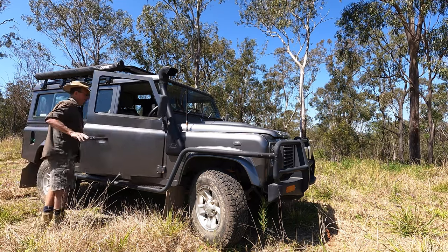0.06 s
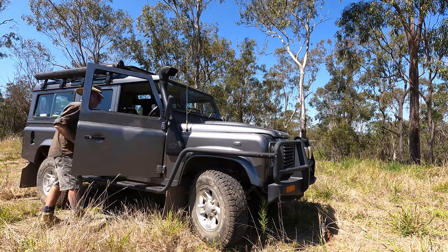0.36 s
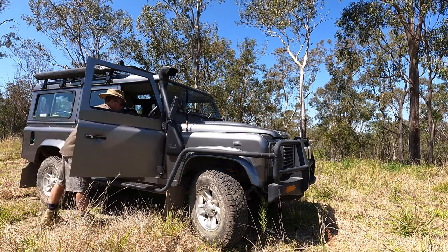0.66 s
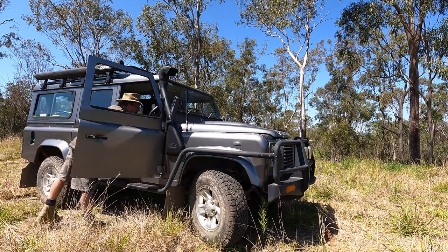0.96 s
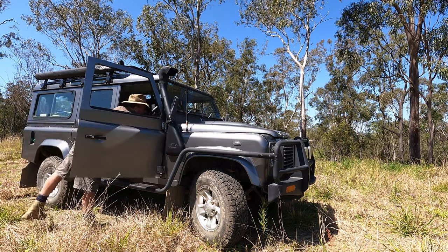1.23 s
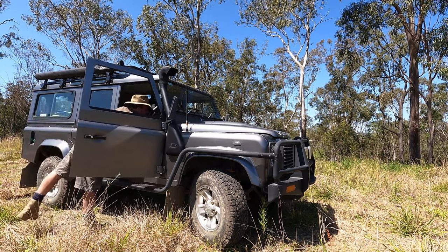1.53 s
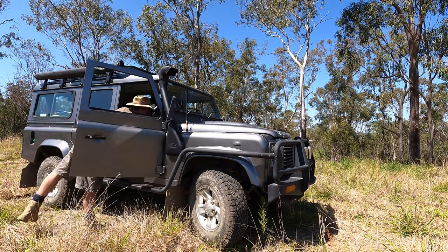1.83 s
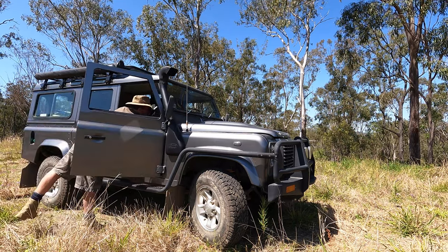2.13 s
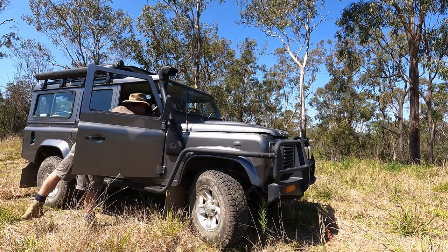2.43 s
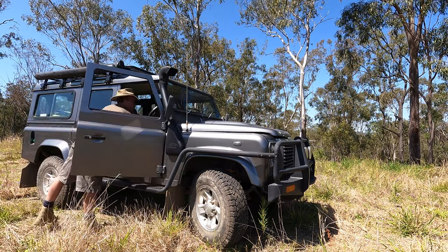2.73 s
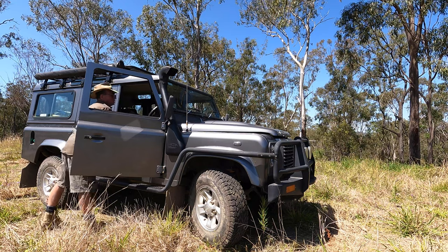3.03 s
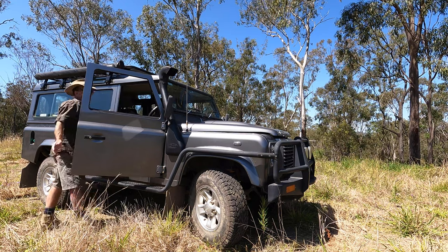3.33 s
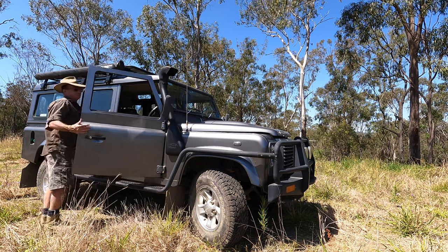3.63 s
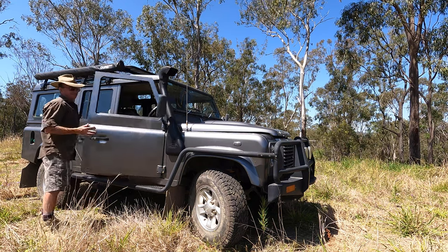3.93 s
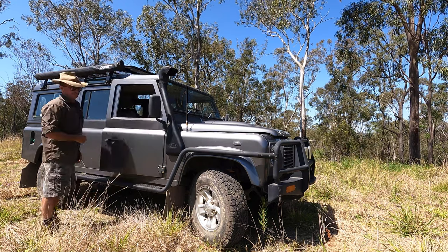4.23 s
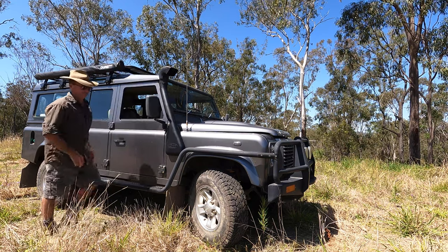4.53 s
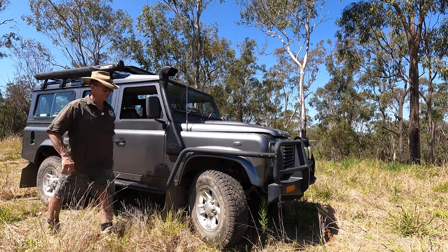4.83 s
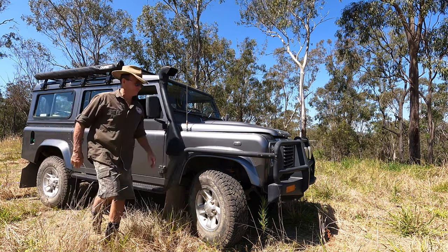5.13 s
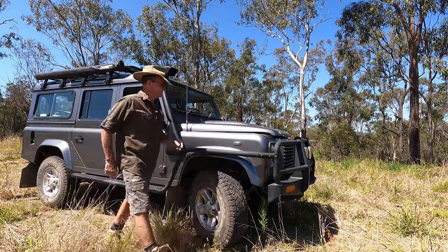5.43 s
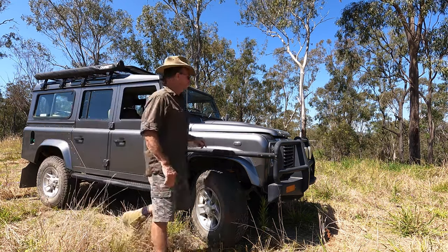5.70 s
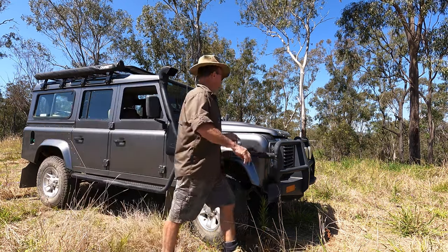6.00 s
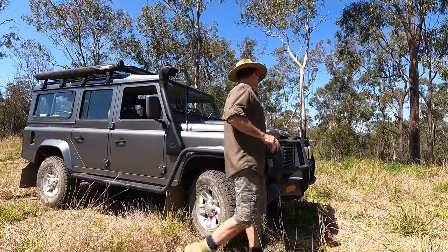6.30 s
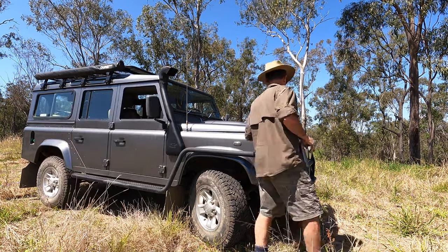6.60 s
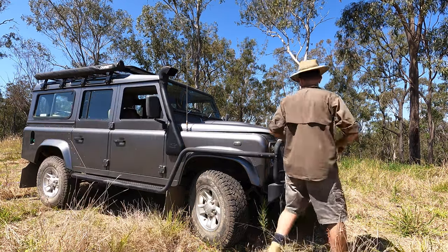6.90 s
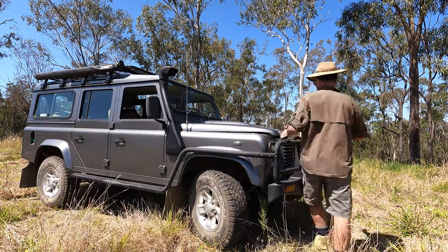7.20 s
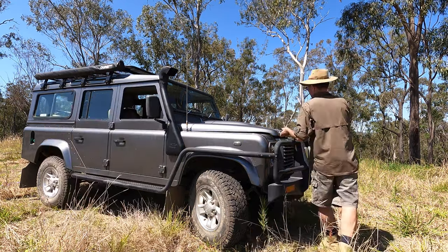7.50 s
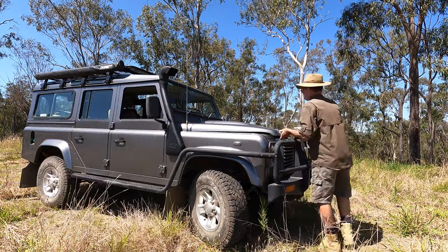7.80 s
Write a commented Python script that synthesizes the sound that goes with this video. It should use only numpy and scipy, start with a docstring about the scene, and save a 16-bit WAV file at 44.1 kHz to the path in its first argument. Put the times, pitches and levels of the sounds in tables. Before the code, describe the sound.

Outdoors, a bonnet springs open with a metallic clunk, then a car door slams and boots rustle through dry grass.

```python
"""In dry grass, out in the open, a man leans into a parked four-wheel drive and pulls the bonnet release.
The sprung bonnet jumps against its safety catch, rattles and rings on. The door knocks over its stay
(the arm that holds it open) and is slammed: the panel booms and the steel latch snaps shut.
He wades round to the front, legs brushing the grass, boots knocking dead wood and snapping stalks.
There is no echo, only a faint hush and a light breeze on the microphone."""
import sys
import numpy as np
from scipy import signal
from scipy.fft import rfft, irfft, next_fast_len
from scipy.io import wavfile

SR = 44100
rng = np.random.default_rng(int(sys.argv[2]) if len(sys.argv) > 2 else 0)


def store_wav(level_fs):
    """Save 16-bit WAV to argv[1]."""
    pcm = np.round(np.clip(np.atleast_2d(level_fs), -1, 1) * 32767)
    wavfile.write(sys.argv[1], SR, pcm.T.astype(np.int16))


N = 350595


# A mode is a note that a struck thing rings at; fade_s is the time it takes to drop by 60 dB.
# A noise table gives the tone of a noise: density_db is its relative strength per hertz.
# The bonnet hitting its catch: start_s, panel_db, clack_db
BONNET_BLOWS = [(2.318, -29.5, -31), (2.323, -22.5, -22.5), (2.358, -21.5, -20), (2.374, -23.5, -23.5),
                (2.401, -27.5, -25.5), (2.437, -19.5, -44), (2.490, -23.5, -30.5), (2.499, -25, -44),
                (2.530, -32, -41)]
# Its main modes: pitch_hz, level_db, fade_s
BONNET_MODES = [(64.03, -15.5, 1.4), (118.4, -16, 2.15), (182.2, -21.5, 1.5), (229.5, -15.5, 0.99),
                (301.5, -23.5, 1.4), (328, -24, 1.9), (418, -17, 1.15), (503, -25.5, 1.4),
                (585, -18.5, 0.92), (683, -17.5, 1.0), (888, -17.5, 0.61), (1244, -10.5, 0.39)]
# Its many weaker modes, blurred into noise: pitch_hz, density_db, fade_s
BONNET_NOISE = [(24.3, -14.5, 2.1), (60, -5.5, 0.72), (112, -0.5, 1.08), (320, -3.5, 1.25), (480, 0, 0.8),
                (844, -3, 0.73), (1220, -7, 0.67), (1966, -12, 0.47), (3980, -21.5, 0.36),
                (7700, -34, 0.49), (15230, -44.5, 0.42)]
# The lifting spring letting go: start_s, level_db
SPRING_RELEASE = [(2.325, -57)]
# The spring's modes: pitch_hz, level_db, fade_s
SPRING_MODES = [(530, -6, 5.7), (854, -6, 6), (1080, -3, 3.9)]

def bonnet_pop():
    """A spring throws the bonnet against its catch; it rattles to rest and both ring on."""
    rattle = rebounds(start_s=2.567, gap_s=.065, shrink=.83, panel_db=-33, clack_db=-31.5, loss_db=5.5)
    blows = BONNET_BLOWS + rattle
    panel = struck(blows, BONNET_MODES, BONNET_NOISE, noise_db=-1.5, rise_s=.0015, clack_rise_s=.0034)
    return panel + rung(SPRING_RELEASE, SPRING_MODES)


# The door hitting its seal and frame: start_s, panel_db, clack_db
DOOR_BLOWS = [(4.4885, -33, -26.5), (4.497, -26, -20), (4.510, -17, -27), (4.522, -14, -25.5),
              (4.5295, -17, -23), (4.541, -33.5, -35.5)]
# Its main modes: pitch_hz, level_db, fade_s
DOOR_MODES = [(173.8, -2.5, .26), (309, -8.5, 0.16), (396, -8.5, 0.31), (423.6, 4.5, 0.091),
              (513.6, -6, 0.071), (637, -7.5, 0.18), (747, -9, 0.23), (860, -9, 0.26), (925, -14.5, .19),
              (1125, -11, .13), (1268, -11, .15), (1496, -18, 0.14), (1654, -23, 0.18), (2000, -19.5, 0.15),
              (2570, -22.5, .15), (3190, -24, .14)]
# Its many weaker modes: pitch_hz, density_db, fade_s
DOOR_NOISE = [(24.8, -9.5, 0.93), (55, -9, 1), (110.1, -3.5, 0.52), (250, -3, 0.31), (420, 5, 0.23),
              (746, -2, 0.24), (1200, -7.5, 0.14), (2174, -11.5, 0.12), (5000, -24, 0.17),
              (9000, -37, 0.17), (16000, -35.5, .12)]
# The door pushing the cabin air and bouncing on its seal: start_s, level_db
CABIN_PUSHES = [(4.4945, -27), (4.5048, -12), (4.535, -30.5), (4.642, -30.5)]
# The deep modes of that air: pitch_hz, level_db, fade_s
CABIN_MODES = [(43, -8, 0.46), (71.7, -4.5, 0.088), (98.9, 5, 0.13), (116.9, -3.5, 0.2)]

def door_slam():
    """The door hits its frame, shudders, and makes the air inside boom."""
    shudder = rebounds(start_s=4.565, gap_s=.0372, shrink=.99, panel_db=-29.5, clack_db=-33.5, loss_db=7)
    blows = DOOR_BLOWS + shudder
    panel = struck(blows, DOOR_MODES, DOOR_NOISE, noise_db=0, rise_s=.00077, clack_rise_s=.001)
    return panel + rung(CABIN_PUSHES, CABIN_MODES)


# The latch riding up the striker, the steel loop it grips: start_s, level_db
STRIKER_RUBS = [(4.4795, -23.5), (4.4895, -25.5), (4.5115, -21.5)]
# The striker's modes: pitch_hz, level_db, fade_s
STRIKER_MODES = [(767, 0, 0.084), (883, -13, 0.082), (1020, -8, 0.039), (1680, -17.5, .05)]
# Steel sliding on steel as they first meet: start_s, level_db
LATCH_SLIDES = [(4.478, -48.5), (4.4888, -32)]
# The rasp of that slide: pitch_hz, density_db, fade_s
RASP_NOISE = [(1500, -11, .07), (4015, 1, .08), (8100, -1.5, .08), (15480, -3, .08)]
# The latch jaw snapping over and settling: start_s, level_db
JAW_SNAPS = [(4.5055, -20.5), (4.5228, -18), (4.5329, -11.5), (4.5352, -11.5), (4.5655, -28), (4.577, -26)]
# The click of the jaw: pitch_hz, density_db, fade_s
JAW_NOISE = [(200, -3.5, .012), (900, 6.5, 0.013), (2020, -3.5, 0.016), (3500, -14.5, 0.013),
             (6130, -10.5, 0.0052), (9000, -16.5, 0.0077), (16000, -23.5, 0.0088)]

def door_latch():
    """The latch scrapes up the striker, sets it ringing and snaps shut round it."""
    ringing = rung(STRIKER_RUBS, STRIKER_MODES)
    return ringing + bursts(LATCH_SLIDES, RASP_NOISE) + bursts(JAW_SNAPS, JAW_NOISE)


# The door bumping over its stay: start_s, panel_db, clack_db
STAY_BLOWS = [(3.7062, -37, -43), (3.7102, -31, -46.5), (3.719, -47, -49)]
# The modes this rings: pitch_hz, level_db, fade_s
STAY_MODES = [(221.5, -11, 0.15), (270, -0.5, 0.2), (363, -28, 2.0), (390, -13, 0.18), (489, 4, 0.069),
              (532, 0.5, 0.074), (703, -1, 0.06), (1070, -10, 0.078)]
# The door's lining shaking: pitch_hz, density_db, fade_s
STAY_NOISE = [(80, -12, 0.33), (250, 1.5, 0.25), (550, 10, 0.062), (1010, -13.5, 0.13), (2420, -14, 0.073),
              (5000, -39, .07), (16000, -33, .05)]

def door_stay():
    """The door knocks as it rides over the arm that holds it open."""
    return struck(STAY_BLOWS, STAY_MODES, STAY_NOISE, noise_db=3.5, rise_s=.0012, clack_rise_s=.00042)


# The lever tugging its cable: start_s, panel_db, clack_db
LEVER_BLOWS = [(1.6965, -58, -70), (1.7012, -43.5, -68), (1.7035, -39.5, -67)]
# The modes this rings: pitch_hz, level_db, fade_s
LEVER_MODES = [(190, -6, 0.21), (386, -7, 0.15), (495, -14, 0.22), (650, -16, .1), (854, -12, 0.098),
               (1260, -13, 0.068)]
# The lining around it shaking: pitch_hz, density_db, fade_s
LEVER_NOISE = [(80, -20, 0.22), (300, -14, 0.19), (556, 5, 0.053), (1090, -13, 0.12), (2000, -24, 0.06),
               (5000, -31.5, 0.035), (16000, -67, .05)]

def release_lever():
    """The lever gives a small clunk as it pulls the bonnet cable tight."""
    clunk = struck(LEVER_BLOWS, LEVER_MODES, LEVER_NOISE, noise_db=4, rise_s=.00064, clack_rise_s=.0005)
    return amp(1.5) * clunk


# Bumps on the door sill and boots on dead wood: start_s, level_db, pitch_hz
KNOCKS = [(.239, -55, 455), (.3755, -41.5, 900), (.518, -41, 520), (.534, -48, 696), (.58, -45, 480),
          (.849, -39.5, 480), (.967, -47, 434), (1.2095, -40.5, 1150), (1.234, -43.5, 523),
          (4.116, -48, 500), (5.12, -39.5, 608), (5.24, -40.5, 500), (5.378, -37, 650), (5.597, -32.5, 596),
          (5.692, -33, 895), (5.708, -40, 675), (6.114, -43, 1620), (6.431, -44.5, 1010),
          (6.481, -44.5, 1140), (7.121, -48, 900), (7.241, -45, 710), (7.436, -40, 1180),
          (7.517, -43.5, 1500)]
# The modes of a hollow knock: pitch_hz, level_db, fade_s
KNOCK_MODES = [(195, -1, 0.21), (453, -2.5, 0.049), (700, -4.5, 0.036), (1100, -4.5, 0.029),
               (1420, -4.5, 0.028), (1740, -3, 0.033), (2700, -8, 0.022)]

def knocks(twig_knocks):
    """Short hollow knocks: a soft hit rings the modes near its own pitch and barely those above."""
    out = np.zeros(N)
    hz, mode_db, fade_s = np.transpose(KNOCK_MODES)
    for start_s, level_db, pitch_hz in KNOCKS + twig_knocks:
        octaves = np.log2(hz / pitch_hz)
        shaped_db = mode_db - 14.5 * abs(octaves) - 8.5 * np.maximum(octaves - .5, 0)
        detuned_hz = hz * (1 + .044 * rng.standard_normal(len(hz)))
        tone = ring(np.transpose([detuned_hz, shaped_db, fade_s]), rise_s=.0014)
        scuff = [(pitch_hz / 8, -22, .05), (pitch_hz / 2, -4, .05), (pitch_hz, 0, .05),
                 (pitch_hz * 2, -13, .04), (pitch_hz * 16, -40, .03)]
        add(out, start_s, amp(level_db) * tone)
        add(out, start_s, amp(level_db - 6) * fade_in(noise_burst(scuff), rise_s=.00075))
    return out


def twigs(crush, count=24, above_crush_db=9, usual_hz=900):
    """List faint chance knocks underfoot: the more weight on the ground, the louder."""
    rows = []
    for when, pitch in rng.random((count, 2)):
        crush_db = 20 * np.log10(crush[int(when * N)] + 1e-9)
        rows.append((when * N / SR, crush_db + above_crush_db, usual_hz * 2 ** (2 * pitch - 1)))
    return rows


# Heavy steps and weight on the sill: start_s, level_db
THUDS = [(.59, -62), (.853, -54.5), (1.24, -60), (4.12, -52.5), (5.599, -43)]
# Their dull sound: pitch_hz, density_db, fade_s
THUD_NOISE = [(30, -23, .1), (130, 8, 0.1), (405, -28, 0.12), (1000, -30, .03), (4000, -50, .02)]
# Dry stalks snapping: start_s, level_db
STALK_SNAPS = [(.6114, -46), (.789, -48), (1.2095, -44.5), (3.1303, -44.5), (4.0218, -44.5), (4.8718, -33),
               (5.6341, -32.5), (5.6935, -37), (6.1164, -39), (6.4817, -42.5), (6.6653, -35), (7.1857, -43),
               (7.5418, -39), (7.8444, -39)]
# The crack of one stalk: pitch_hz, density_db, fade_s
STALK_NOISE = [(500, -14.5, 0.029), (2500, -5, 0.034), (8450, 0.5, 0.029), (16000, -9, 0.036)]

def boots():
    """Boots land with a thud and break dry stalks."""
    return bursts(THUDS, THUD_NOISE) + amp(-6) * bursts(STALK_SNAPS, STALK_NOISE)


# A leg sweeping through the grass: start_s, rise_s, level_db
STRIDES = [(-.14, 0.17, -66), (.2, 0.2, -62.5), (.425, 0.029, -55.5), (.67, .22, -65), (1.01, .018, -63.5),
           (2.98, .19, -64), (3.38, 0.34, -63), (4.0, 0.087, -57.5), (4.24, .2, -64.5), (4.705, 0.18, -47),
           (5.28, 0.12, -47), (5.561, 0.19, -52.5), (5.73, 0.12, -49.5), (6.03, 0.16, -56.5),
           (6.552, 0.055, -51), (6.635, .1, -46), (6.84, 0.2, -58), (7.22, .15, -51.5), (7.55, 0.16, -61),
           (7.78, 0.052, -57)]
# A sole settling on the tufts: start_s, level_db
TREADS = [(.41, -61.5), (.545, -56.5), (.79, -63.5), (2.11, -69.5), (3.15, -60.5), (4.07, -63.5),
          (4.42, -61.5), (4.94, -54.5), (5.36, -58), (6.075, -58), (6.181, -54.5), (6.89, -55.5),
          (7.33, -60)]

def walking(bend_db=-12.5, breeze_stir_db=-77):
    """Work out how loudly the grass is brushed and crushed at each moment."""
    t = np.arange(0, N / SR, .002)
    legs = sum((amp(db) * sweep(t, start_s, rise_s)) ** 2 for start_s, rise_s, db in STRIDES)
    soles = sum((amp(db) * sweep(t, start_s, rise_s=.053)) ** 2 for start_s, db in TREADS)
    swish_power = legs + amp(breeze_stir_db) ** 2
    crush_power = soles + legs * amp(bend_db) ** 2  # passing legs bend the tufts too
    return [np.interp(np.arange(N) / SR, t, np.sqrt(power)) for power in (swish_power, crush_power)]


def sweep(t, start_s, rise_s):
    """One leg movement speeds up, then slows more gently; its rustle grows with the speed."""
    progress = np.maximum(t - start_s, 0) / rise_s
    speed = progress * np.exp(1 - progress)
    return speed ** 1.71


# Dry blades brushing a leg: pitch_hz, density_db
SWISH_NOISE = [(200, -21), (1000, -6), (2500, -4.5), (4000, -2.5), (6200, -3), (8000, 2), (10700, -5.5),
               (13600, -0.5), (16000, -7.5)]
# Tufts crushed under a sole: pitch_hz, density_db
CRUSH_NOISE = [(60, -13.5), (200, -5), (500, 1.5), (1200, -1), (2200, -5.5), (4000, -13), (10000, -36)]

def grass(swish, crush, flutter_hz=130, flutter_db=1.83):
    """Blades brush the legs, the odd stem cracks, and tufts crunch under the soles."""
    blades = grains(SWISH_NOISE, per_second=32000, spread_db=2.4)
    stems = amp(-7.5) * grains(STALK_NOISE, per_second=240, spread_db=1.5)
    soles = grains(CRUSH_NOISE, per_second=4000, spread_db=3)
    # The level flutters as tufts catch and let go.
    jitter = rng.standard_normal(4000)
    flutter = np.interp(np.arange(N) / SR * flutter_hz, np.arange(len(jitter)), jitter)
    return amp(flutter_db * flutter) * (swish * (blades + stems) + crush * soles)


# The hush of open air: pitch_hz, density_db
AIR_NOISE = [(20, -2.5), (36, -8.5), (60, -15), (134, -17.5), (400, -22), (825, -26), (2500, -32),
             (8000, -40.5), (16000, -46)]

def air(hush_db=-64, breeze_db=-44.5, gust_hz=3.84):
    """A faint hush, and slow pushes of the breeze on the microphone."""
    gusts = signal.sosfilt(signal.butter(3, gust_hz, fs=SR, output="sos"), rng.standard_normal(N))
    hush = colour(rng.standard_normal(N), AIR_NOISE)
    return amp(hush_db) * hush + amp(breeze_db) * unit(gusts)


# Steel latch parts clacking, used for every panel blow: pitch_hz, density_db, fade_s
CLACK_NOISE = [(100, -23.5, .05), (600, -8, 0.038), (1850, 4.5, 0.054), (3000, 3.5, 0.039),
               (5000, -3.5, 0.073), (8500, -6.5, 0.059), (10920, -17.5, 0.077), (16070, -16, .06)]

def struck(blows, modes, noise_table, noise_db, rise_s, clack_rise_s):
    """Each blow rings a panel's main and weaker modes, and the steel clacks where it is hit."""
    out, tone = np.zeros(N), ring(modes)
    for start_s, panel_db, clack_db in blows:
        weak_modes = fade_in(noise_burst(noise_table), rise_s)  # the shaking takes time to spread
        clack = fade_in(noise_burst(CLACK_NOISE), clack_rise_s)
        add(out, start_s, amp(panel_db) * tone)
        add(out, start_s, amp(panel_db + noise_db) * weak_modes)
        add(out, start_s, amp(clack_db) * clack)
    return out


def rebounds(start_s, gap_s, shrink, panel_db, clack_db, loss_db, count=4):
    """List the blows of a panel settling on its catch, each weaker and sooner than the last."""
    bounce = np.arange(count)
    gaps_s = gap_s * shrink ** bounce
    starts_s = start_s + np.cumsum(gaps_s) - gaps_s
    return list(zip(starts_s, panel_db - loss_db * bounce, clack_db - loss_db * bounce))


def ring(modes, rise_s=.00096):
    """Struck modes are pure tones that die away; neighbours swing opposite ways."""
    length_s = min(max(fade_s for _, _, fade_s in modes), 2.2)
    t = np.arange(int(SR * length_s)) / SR
    tone = sum((-1) ** k * amp(db) * np.sin(2 * np.pi * hz * t) * amp(-60 * t / fade_s)
               for k, (hz, db, fade_s) in enumerate(modes))
    return fade_in(tone, rise_s)


def rung(events, modes):
    """Ring the same modes at each event."""
    out, tone = np.zeros(N), ring(modes)
    for start_s, level_db in events:
        add(out, start_s, amp(level_db) * tone)
    return out


def noise_burst(table, bands=12):
    """Too many modes to tell apart: noise in which each band of pitch fades at its own rate."""
    hz, _, fade_s = np.transpose(table)
    length = 2 ** int(np.ceil(np.log2(fade_s.max() * SR)))
    noise = rng.standard_normal(2 ** 16)[:length]
    t = np.arange(len(noise)) / SR
    spectrum = rfft(colour(noise, table))
    centres_hz = np.geomspace(hz[0], hz[-1], bands)
    band_position = along(np.fft.rfftfreq(len(t), 1 / SR), centres_hz, np.arange(bands))
    out = np.zeros(len(t))
    for k, centre_hz in enumerate(centres_hz):
        band = irfft(spectrum * np.maximum(1 - abs(band_position - k), 0))
        out += band * amp(-60 * t / along(centre_hz, hz, fade_s))
    return out


def bursts(events, table):
    """Play a fresh burst of noise at each event."""
    out = np.zeros(N)
    for start_s, level_db in events:
        add(out, start_s, amp(level_db) * noise_burst(table))
    return out


def grains(table, per_second, spread_db):
    """Countless tiny clicks, most faint and a few strong."""
    clicks = (rng.random(N) < per_second / SR) * rng.standard_normal(N)
    boost_db = spread_db * np.minimum(rng.exponential(size=N), 5)
    return colour(clicks * amp(boost_db), table)


def colour(sound, table):
    """Give a sound the tone of a noise table, at an average (rms) level of 1."""
    hz, db = np.transpose(table)[:2]
    size = next_fast_len(len(sound))
    gain = amp(along(np.fft.rfftfreq(size, 1 / SR), hz, db))
    return unit(irfft(rfft(sound, size) * gain, size)[:len(sound)])


def fade_in(sound, rise_s):
    """Soften the start of a sound."""
    return sound * (1 - np.exp(-np.arange(len(sound)) / (SR * rise_s)))


def along(hz, points_hz, values):
    """Read between the points of a table, with pitch spaced in octaves."""
    return np.interp(np.log(np.maximum(hz, 1)), np.log(points_hz), values)


def add(out, start_s, sound):
    """Mix a sound in at its start time."""
    start = max(int(start_s * SR), 0)
    out[start:start + len(sound)] += sound[:N - start]


def amp(db):
    """Turn decibels into a gain."""
    return 10 ** (np.asarray(db) / 20)


def unit(sound):
    """Scale to an average (rms) level of 1."""
    return sound / np.sqrt(np.mean(sound ** 2))


def scene():
    """Mix the car, the man's steps and the air into one channel."""
    car = release_lever() + bonnet_pop() + door_stay() + door_slam() + door_latch()
    swish, crush = walking()
    steps = knocks(twigs(crush)) + boots() + grass(swish, crush)
    return (car + steps + air())[None]


def record(dry, ceiling=.85, top_hz=15850):
    """Round off the loudest peaks and cut the highest treble."""
    rounded = dry / (1 + (dry / ceiling) ** 6) ** (1 / 6)
    return signal.sosfilt(signal.ellip(10, .2, 70, top_hz, fs=SR, output="sos"), rounded)


dry = scene()
out = record(dry)
store_wav(out)
```